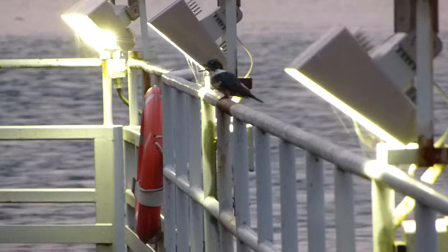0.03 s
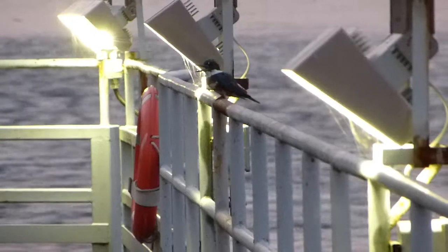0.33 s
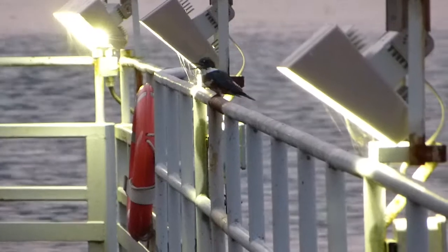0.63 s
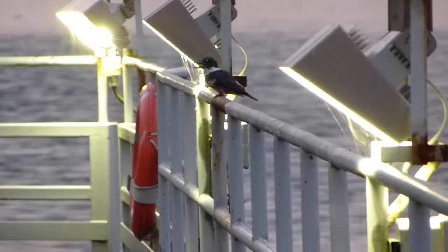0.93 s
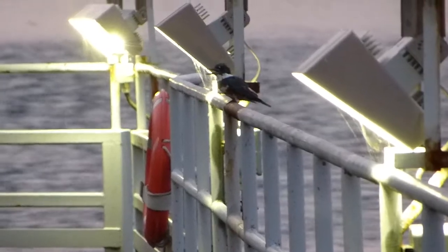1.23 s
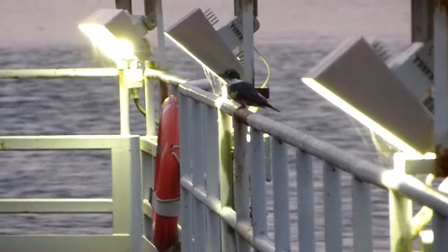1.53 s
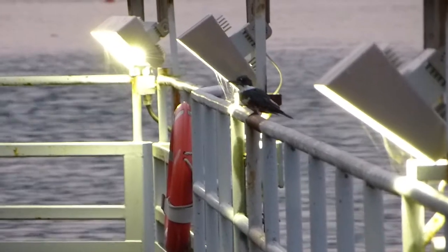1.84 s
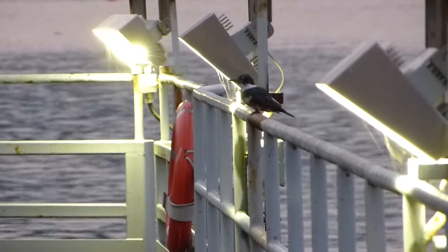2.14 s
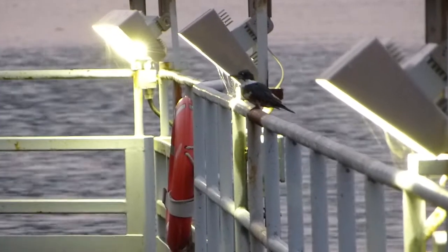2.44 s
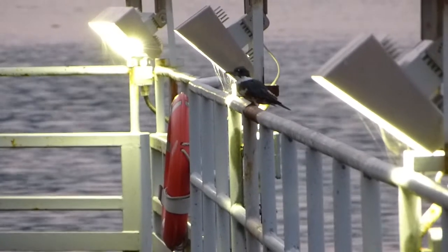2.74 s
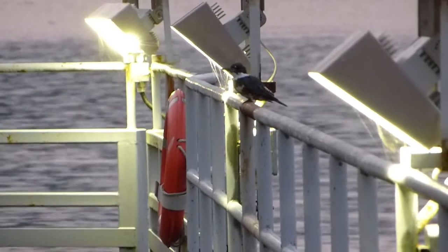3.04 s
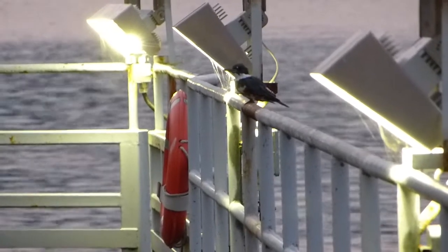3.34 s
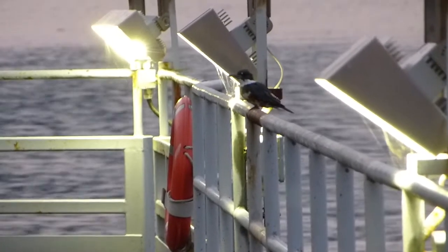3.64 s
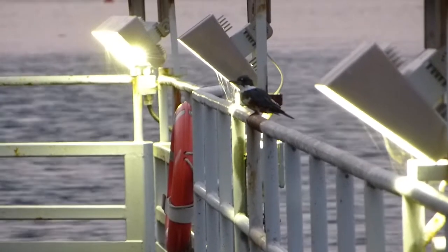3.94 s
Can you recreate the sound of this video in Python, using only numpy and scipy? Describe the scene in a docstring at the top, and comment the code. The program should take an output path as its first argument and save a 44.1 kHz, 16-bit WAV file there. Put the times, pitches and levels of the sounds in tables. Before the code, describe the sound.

A bird's rapid, harsh rattling call echoes over a low machinery hum and water wash.

```python
"""A kingfisher rattles from a steel railing on a dock: two dozen very short notes, each a shrill buzz
of pulses ringing the throat and bill, that sags in pitch, flicks up and breaks into a loose rasp.
The dock throws back slaps and a ringing tail. Underneath, four machines hum and whine on the harmonics
of their shafts, over a wide wash of air and water and a few soft, hollow booms."""
import sys
import numpy as np
from scipy import signal
from scipy.fft import rfft, irfft
from scipy.io import wavfile

SR = 44100
rng = np.random.default_rng(int(sys.argv[2]) if len(sys.argv) > 2 else 0)


def store_pcm(level_fs):
    """Save levels as 16-bit WAV."""
    pcm = np.round(np.clip(level_fs, -1, 1) * 32767).astype(np.int16)
    wavfile.write(sys.argv[1], SR, np.atleast_2d(pcm).T)


N = 176400


def undb(db):
    """Decibels to gain."""
    return 10 ** (np.asarray(db) / 20)


def pan(db):
    """Left and right gains for a pan in dB, left minus right."""
    return undb(np.array([[db], [-db]]) / 2)


def contour(points, hz):
    """Read a (freq_hz, level_db) curve on a log-frequency axis."""
    freq_hz, level_db = np.array(points, float).T
    return np.interp(np.log(hz + 1), np.log(freq_hz), level_db)


def colour(x, points):
    """Minimum-phase EQ that follows a (freq_hz, level_db) curve."""
    size = 2 * N
    gain = undb(contour(points, np.fft.rfftfreq(size, 1 / SR)))
    cepstrum = irfft(np.log(gain))
    cepstrum[1:N] *= 2
    cepstrum[N + 1:] = 0
    return irfft(rfft(x, size) * np.exp(rfft(cepstrum)))[..., :N]


def walk(rate_hz):
    """Smooth random modulation with a spread of one, moving at up to about rate_hz."""
    lowpass = 1 / (1 + (np.fft.rfftfreq(N, 1 / SR) / rate_hz) ** 4)
    drift = irfft(rfft(rng.standard_normal(N)) * lowpass)
    return drift / drift.std()


def tone(hz, level_db, pan_db, left_lead_rad):
    """A stereo sine on a pitch curve and a level curve."""
    phase = 2 * np.pi * (np.cumsum(hz) / SR + rng.random())
    return np.sqrt(2) * undb(level_db) * pan(pan_db) * np.sin(np.array([phase + left_lead_rad, phase]))


def kingfisher_rattle():
    """Each note is a falling pulse train that rings the throat: clear, then a flick and a raspy end."""
    # notes of the rattle: start_s, level_db, pitch_hz
    notes = [(.087, 1, 2000), (.144, -3, 2000), (0.1957, -1.5, 2010), (0.252, -0.5, 2040),
             (0.2987, -1.5, 2009), (0.3583, .7, 2028), (0.4073, .2, 2018), (.4642, 1, 2027),
             (0.5171, 1, 2040), (0.5765, 1, 2025), (0.6202, -0.5, 2003), (0.6827, 1.2, 2032),
             (.7469, 0.3, 2030), (0.7968, -1.5, 1986), (0.8679, -1.2, 1994), (0.9406, 0, 1980),
             (1.0066, -1, 1997), (1.055, -3.5, 1896), (1.1227, -.7, 1999), (1.1828, -2, 1954),
             (1.2402, -1.1, 1970), (1.302, -1.3, 1968), (1.3634, -1.6, 1926), (1.4187, -1.5, 1934),
             (1.4843, -2.5, 1953)]
    # shape of every note: time_s, pitch_ratio, level_db, tilt_db_per_octave above the main resonance
    gesture = [(0, 1.05, 3, -1), (.0012, 0.98, 1, 0.5), (.0026, 0.97, -1.5, -13), (.0046, 0.91, -0.5, -13),
               (.0058, .87, 0, -1.5), (.0068, .81, -1.5, 3), (.008, .74, -3.5, 7), (.0092, .63, -4.5, -5),
               (0.0107, .5, -1.5, 2), (0.0127, .42, -3, 2)]
    # resonances of throat and bill: freq_hz, level_db
    throat = [(900, -54), (2000, -14.5), (2400, -7), (2750, -2), (3300, -3), (3700, -1), (4050, 1.5),
              (4500, -6), (5100, -6), (5700, -9.5), (6400, -2.5), (7400, -14), (8600, -14), (9600, -33.5),
              (11500, -36), (14000, -82)]
    attack_s, release_s = .0013, .00068
    resonance_hz, body_hz = 4040, 3000
    flick_start_s, flick_length_s = .00817, .00308
    time_s, ratio, level_db, tilt = np.array(gesture).T
    jitter, breath = walk(550), rng.standard_normal(N)
    harmonic = np.arange(1, 25)[:, None]
    t = np.arange(int(time_s[-1] * SR)) / SR
    looseness = (t / time_s[-1]) ** 4
    attack = np.sin(np.pi / 2 * np.clip(t / attack_s, 0, 1)) ** 2
    release = np.clip((t[-1] - t) / release_s, 0, 1)
    envelope = attack * release * undb(np.interp(t, time_s, level_db))
    rise = np.clip((t - flick_start_s) / flick_length_s, 0, 1)
    flick_hz = 2100 + 1800 * rise
    flick_cycles = np.cumsum(flick_hz) / SR
    voice = np.zeros(N)
    for start_s, note_db, pitch_hz in notes:
        span = int((start_s - attack_s / 2) * SR) + np.arange(len(t))
        wobble = np.exp((.0046 + .071 * looseness) * jitter[span])
        hz = pitch_hz * np.interp(t, time_s, ratio) * wobble
        phase = 2 * np.pi * np.cumsum(hz) / SR
        partial_hz = harmonic * hz
        # as the rattle goes on, its top dulls and its low end fills out
        octaves_above = np.log2(np.maximum(partial_hz / resonance_hz, 1))
        top_db = (np.interp(t, time_s, tilt) - 1.5 * (start_s - 1)) * octaves_above
        body_db = (-3.5 + 4.5 * start_s) / (1 + (partial_hz / body_hz) ** 10)
        gains = undb(top_db + body_db) * (partial_hz < SR / 2)
        pulses = (gains * np.cos(harmonic * phase)).sum(0) * np.sqrt(hz / pitch_hz)
        rasp = undb(-5) * looseness * breath[span] * (2 + 2 * np.cos(phase))
        flick = undb(-.5) * np.sin(np.pi * rise) * np.sin(2 * np.pi * (flick_cycles + rng.random()))
        voice[span] += ((pulses + rasp) * envelope + flick) * undb(note_db)
    return colour(voice, throat) * undb(-30.5)


def scatter(x, decay_s, build_s, width=.47):
    """Dense reflections that build up and die away, partly different at each ear."""
    t = np.arange(N) / SR
    envelope = np.exp(-t / decay_s) * (1 - np.exp(-t / build_s))
    mid, side = rng.standard_normal((2, N)) * envelope / np.sqrt(np.sum(envelope ** 2))
    response = np.array([mid + width * side, mid - width * side]) / np.hypot(1, width)
    return signal.fftconvolve(x[None], response, axes=1)[:, :N]


def dock_echoes(call):
    """The direct call with a deck bounce, railing scatter, wall slaps and the tail of the whole dock."""
    # EQ of the scatter off the railing: freq_hz, level_db
    railing_eq = [(2000, 4), (2500, 6), (2750, 10.5), (3150, -1), (4000, -1.5), (6000, 1.5), (10000, 4.5)]
    # slapbacks off nearby walls: delay_s, level_db, pan_db
    walls = [(0.0267, -12, 8), (0.0296, -9.5, 8.5), (.0375, -15, 0)]
    # EQ of the slapbacks: freq_hz, level_db
    slap_eq = [(2000, -10), (2800, -15), (3200, 1), (3450, 1.5), (3800, -14), (4150, -9), (5000, -18),
               (5850, 7), (6300, -8), (10000, -19)]
    # EQ of the reverb tail: freq_hz, level_db
    tail_eq = [(1500, -5.5), (2700, 1), (3600, 1.4), (4500, -2), (6000, -4), (8000, -2.5), (12000, -14)]
    deck_delay_s, tail_t60_s = .0123, .58
    t = np.arange(N) / SR
    bounce = undb(-15) * np.interp(t - deck_delay_s, t, call)
    railing = scatter(colour(call, railing_eq), decay_s=.0086, build_s=.0042)
    slap = colour(call, slap_eq)
    slaps = sum(undb(db) * pan(pan_db) * np.interp(t - delay_s, t, slap) for delay_s, db, pan_db in walls)
    tail = scatter(colour(call, tail_eq), decay_s=tail_t60_s / np.log(1000), build_s=.02)
    return (call + bounce) * pan(2.5) + undb(-8) * railing + slaps + undb(-2) * tail


def machine(shaft_hz, partials, swell_db, wander, flutter_db):
    """Harmonics of one slightly wandering shaft, each fluttering on its way across the dock."""
    hz = shaft_hz * (1 + wander * walk(5.15))
    return sum(tone(harmonic * hz, db + swell_db.get(harmonic, 0) + flutter_db * walk(10.8), pan_db, lead)
               for harmonic, (db, pan_db, lead) in partials.items())


def machinery():
    """Four machines, each at its own speed; the two strongest lines of the whine swell and fade."""
    # partials of each machine, by harmonic: level_db, pan_db, left_lead_rad
    whine = {1: (-61, -6, 0.15), 2: (-70.5, 0, .3), 3: (-64, 5.1, 1), 4: (-68.5, -16, 0.68),
             6: (-64, 4.3, 1), 7: (-51.5, 0, 0.97), 8: (-55.5, 3.1, 0.98), 9: (-71.5, 0, -0.13),
             10: (-76, 0, -0.33), 11: (-59, 4.7, 0.77), 13: (-69, -5, 0.69), 14: (-70.5, 0, 0.19),
             15: (-60.5, -2.2, 1), 16: (-75, -1, 0.61), 22: (-81, 0, .3), 23: (-71, 0, 0.25),
             24: (-67, 0, .3)}
    motor = {2: (-66.5, -2.5, 0), 14: (-64, -2, 0.27), 15: (-62.5, 2, 0.7), 16: (-64.5, 2, 0.45),
             17: (-66, 4, 0.31), 18: (-59.5, 7.9, 0.3), 19: (-71, 2, 0.48)}
    engine = {2: (-68.5, -8, 0), 3: (-59, -5, 0.33), 4: (-57.5, -11.5, -2.25)}
    pump = {9: (-66, -2, .3), 10: (-60.5, 0, 1)}
    # level rides on the whine, each taken about its mean: time_s, seventh_db, eighth_db
    whine_rides = [(.2, -54.5, -56), (.9, -54, -55), (1.2, -52.5, -55), (1.4, -50.5, -57.5),
                   (1.7, -52.5, -56.5), (2.1, -54, -56), (2.7, -53, -55.5), (3.1, -53.5, -55),
                   (3.4, -49.5, -53.5), (3.65, -54.5, -53), (4, -52.5, -53)]
    time_s, *rides = np.array(whine_rides).T
    t = np.arange(N) / SR
    swell_db = {harmonic: np.interp(t, time_s, db - db.mean()) for harmonic, db in zip((7, 8), rides)}
    return (machine(204.87, whine, swell_db, wander=.00073, flutter_db=1.43)
            + machine(58.14, motor, {}, wander=.00099, flutter_db=2.5)
            + machine(76.8, engine, {}, wander=.00593, flutter_db=3)
            + machine(52.8, pump, {}, wander=.0028, flutter_db=3))


def hiss_resonances(hz):
    """Lift in dB from narrow peaks in the hiss and the fine ripple that standing reflections leave."""
    # resonances in the machinery's hiss: freq_hz, width_hz, lift_db
    peaks = [(2920, 60, 5.5), (4087, 110, 6), (7180, 61, 8.5)]
    ripple_db, ripple_step_hz = 1.5, 23
    ripple = np.interp(hz / ripple_step_hz, np.arange(N), rng.standard_normal(N))
    ripple *= np.clip(hz / 800, 0, 1) ** 2  # the bass stays smooth
    peaks_db = sum(db / (1 + ((hz - freq_hz) / (width_hz / 2)) ** 2) for freq_hz, width_hz, db in peaks)
    return ripple_db * ripple + peaks_db


def wash():
    """Air, water and distant engines: wide noise whose octaves swell together and flicker apart."""
    # tone of the bed: freq_hz, relative_db
    spectrum = [(30, -26.5), (85, -22.5), (125, -12.5), (190, -9), (245, -1.5), (330, -4.5), (430, -6.5),
                (650, -1.5), (950, -7), (1150, -8.5), (1350, -10.5), (1750, -12), (2500, -19),
                (3300, -17.5), (4300, -18), (6000, -16.5), (7500, -22), (10000, -31.5), (12000, -40.5),
                (14000, -59)]
    # stereo width: freq_hz, side_minus_mid_db
    spread = [(60, -17), (150, -24), (300, -2), (700, -2.5), (1500, -3), (4000, -8.5), (9000, -0.5)]
    # stereo balance: freq_hz, pan_db
    balance = [(60, 7), (150, 0.5), (280, -5.5), (450, -3), (650, 2), (1200, 1), (9000, -0.5)]
    # slow level ride: time_s, offset_db
    ride = [(0, 0), (1, 0), (1.9, 0.05), (2.3, 0.4), (2.7, -0.26), (3.45, 0.7), (4, 0.5)]
    hz = np.fft.rfftfreq(N, 1 / SR)
    mid, side = rfft(rng.standard_normal((2, N)))
    width, pan_db = undb(contour(spread, hz)), contour(balance, hz)
    noise = np.array([mid + width * side, mid - width * side]) / np.hypot(1, width)
    noise *= undb(contour(spectrum, hz) + hiss_resonances(hz) + np.array([pan_db, -pan_db]) / 2)
    octave = np.clip(np.log2((hz + 1) / 125), 0, 6)
    bed = 0
    for band in range(7):
        band_gain = np.clip(1 - np.abs(octave - band), 0, 1)
        flicker_db = 1.5 * walk(21) / (1 + band / 4)
        bed = bed + irfft(noise * band_gain) * undb(flicker_db)
    level_db = -44 + np.interp(np.arange(N) / SR, *np.array(ride).T) - .1 * walk(4.5)
    return bed / bed.std() * undb(level_db)


def booms():
    """The rumble gathers now and then into a soft hollow boom: a short swell of a wavering low tone."""
    # swells in the rumble: peak_s, level_db, length_s
    swells = [(0.228, -49.5, 0.061), (2.41, -53, 0.059), (3.488, -46.5, .11), (3.789, -43.5, 0.041)]
    t = np.arange(N) / SR
    envelope = sum(undb(db) * np.cos(np.pi * np.clip((t - peak_s) / length_s, -.5, .5)) ** 2
                   for peak_s, db, length_s in swells)
    pitch_hz = 237 * (1 + .025 * walk(25))
    return envelope * tone(pitch_hz, level_db=0, pan_db=-3.5, left_lead_rad=0)


def scene():
    """The bird on its dock over machinery and water."""
    return dock_echoes(kingfisher_rattle()) + machinery() + booms() + wash()


def record(dry):
    """The mix cuts in mid-rattle after a moment of silence; a steep low-pass trims the top."""
    start_s, fade_s, cutoff_hz = .177, .0037, 13900
    fade_in = np.clip((np.arange(N) / SR - start_s) / fade_s, 0, 1)
    lowpass = signal.ellip(8, .2, 70, cutoff_hz, fs=SR, output="sos")
    return signal.sosfilt(lowpass, dry * fade_in)


dry = scene()
out = record(dry)
store_pcm(out)
```